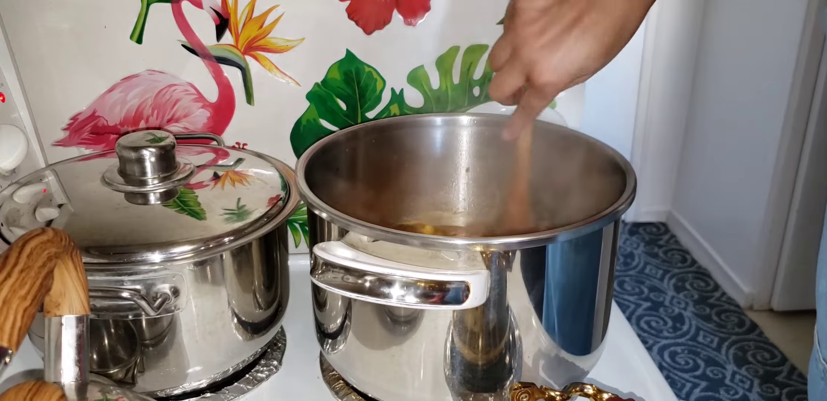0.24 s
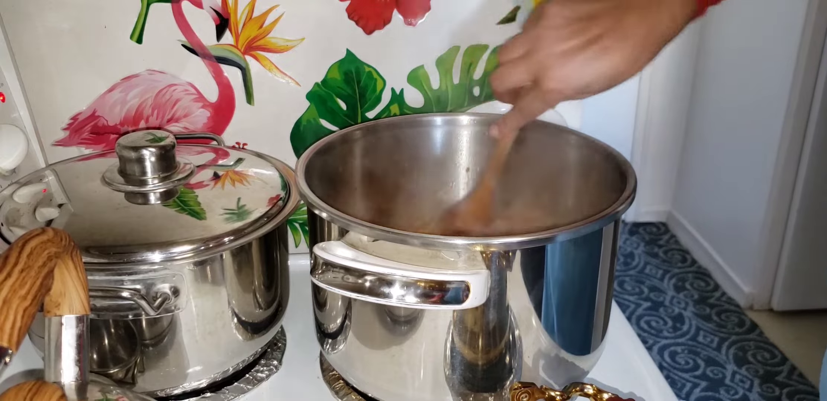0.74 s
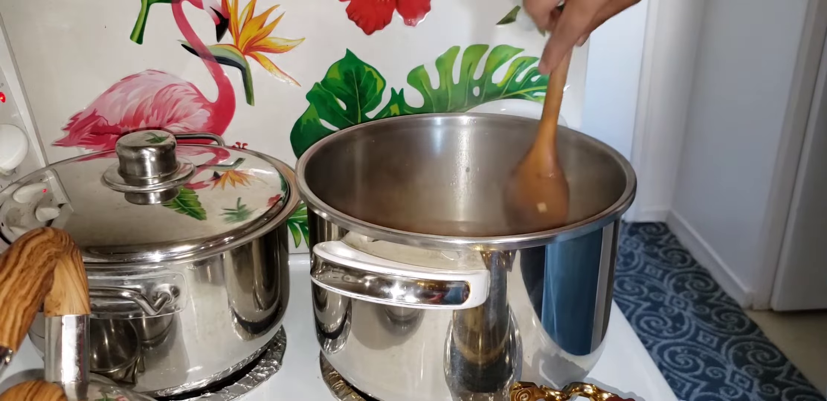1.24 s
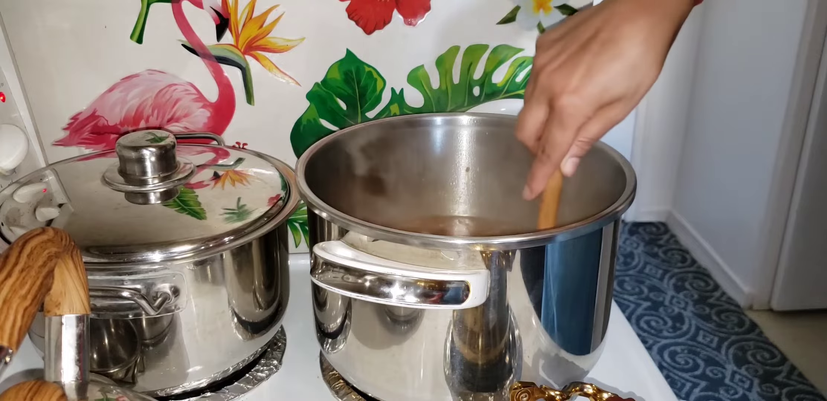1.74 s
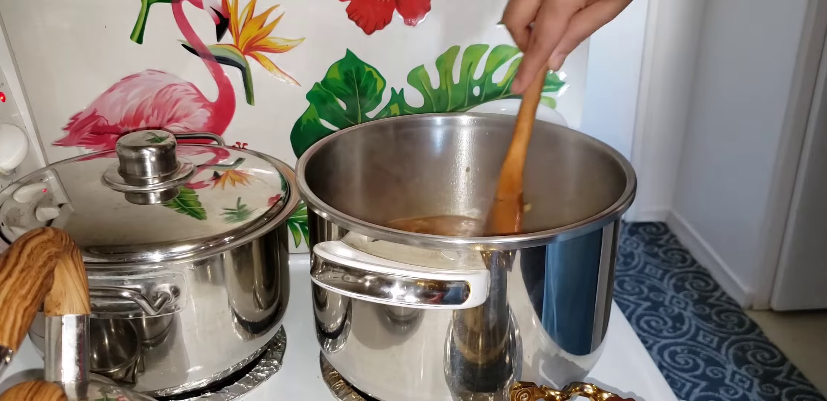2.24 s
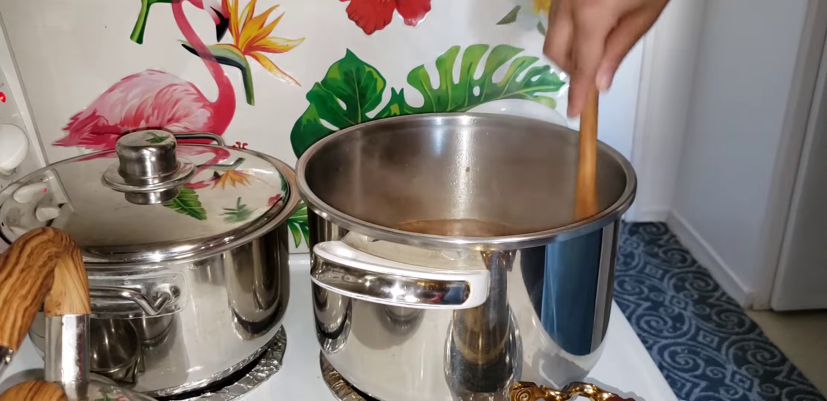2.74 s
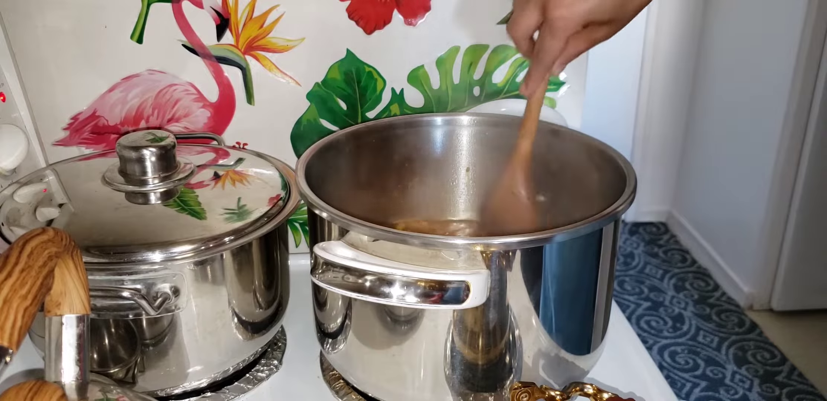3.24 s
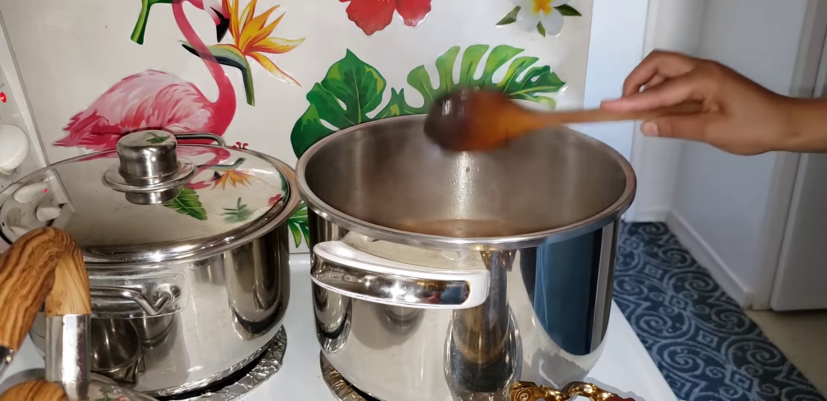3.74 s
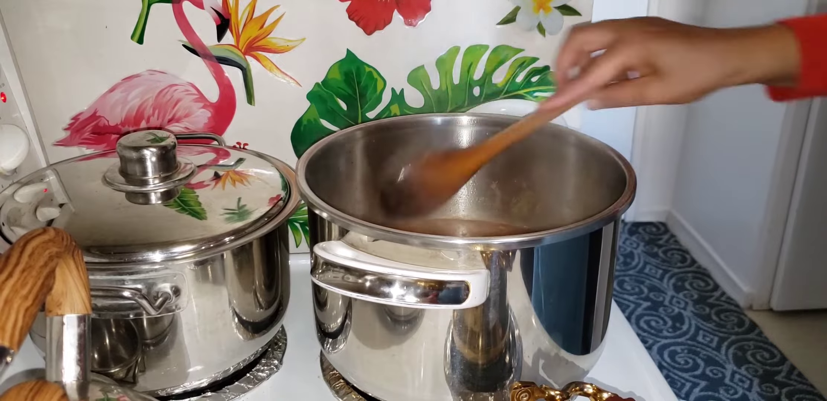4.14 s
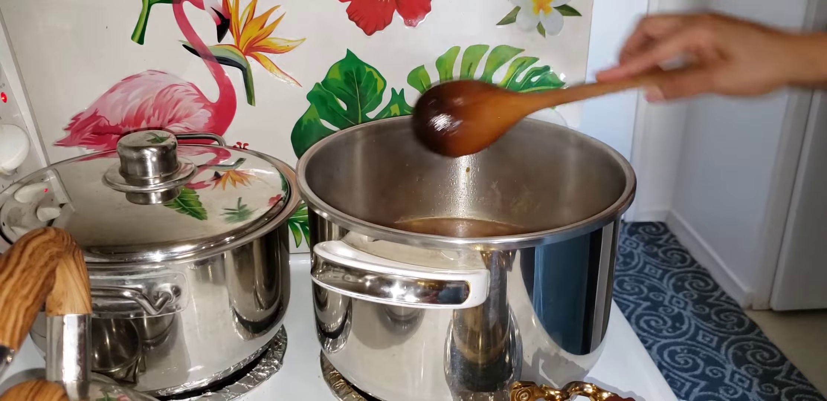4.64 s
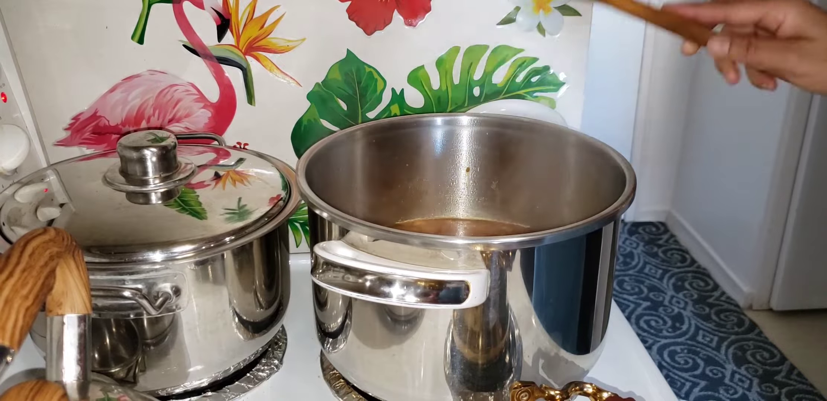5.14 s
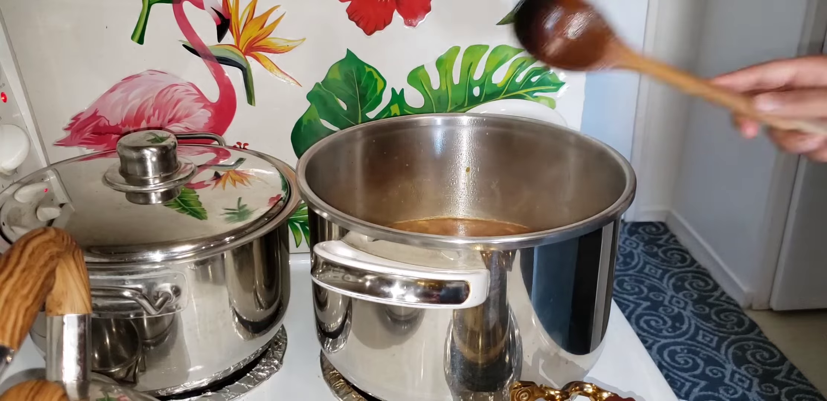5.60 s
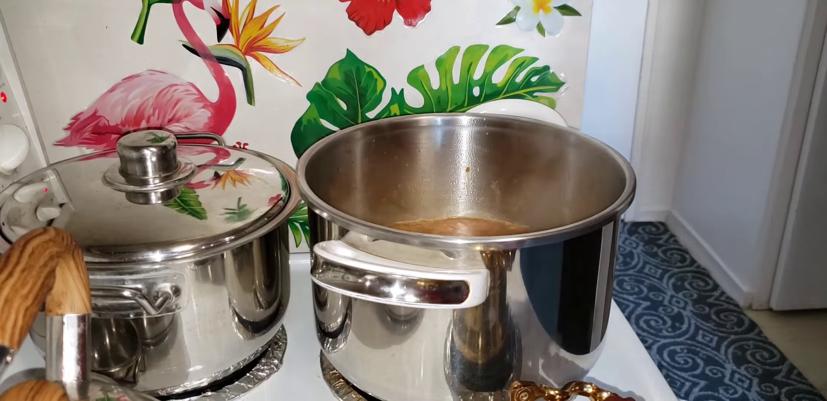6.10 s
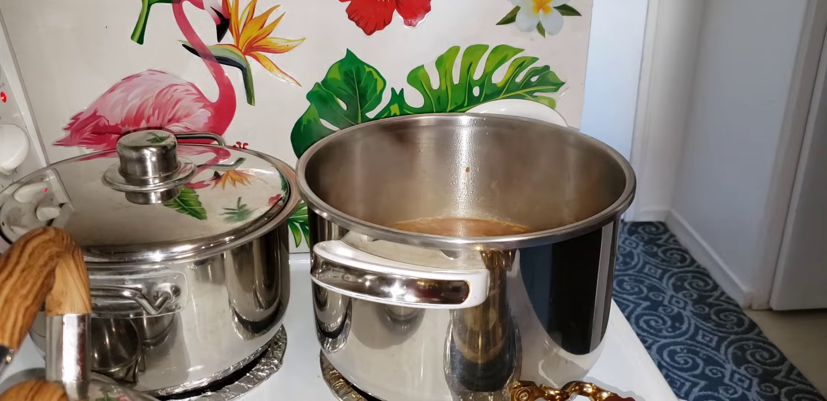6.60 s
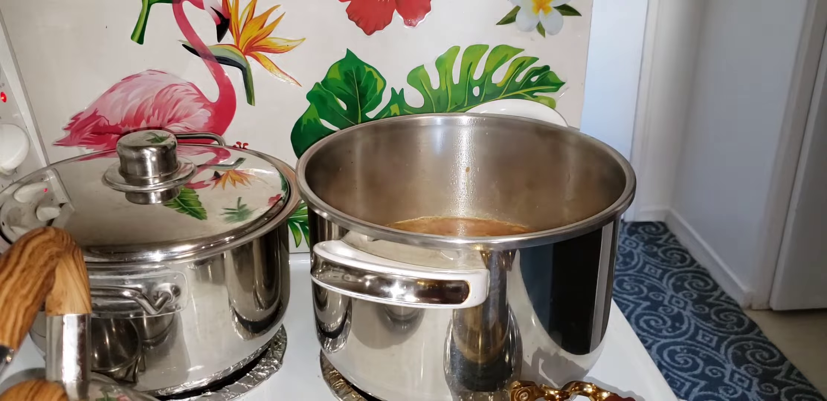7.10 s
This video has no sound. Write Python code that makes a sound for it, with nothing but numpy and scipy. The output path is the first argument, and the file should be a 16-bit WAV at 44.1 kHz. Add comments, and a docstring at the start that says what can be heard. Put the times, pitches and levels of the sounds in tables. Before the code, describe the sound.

A wooden spoon stirs thin sauce in a steel pot with wet squelches, taps the rim five times, then clatters onto a dish.

```python
"""Small kitchen: a wooden spoon stirs a thin sauce in a steel pot on a hissing gas stove, close by.
Coloured noise makes the hiss and room drone; tearing films and ringing bubbles make the sauce.
The spoon bumps the wall and is tapped on the rim five times to shake off the drops: noise cracks and
decaying modes, while the pot booms on its grate. It swishes away as a noise swell and is put down
with a clatter of bouncing blows on a ringing dish beside the stove."""
import sys
import numpy as np
from scipy import signal
from scipy.fft import rfft, irfft
from scipy.io import wavfile

SR = 44100
rng = np.random.default_rng(int(sys.argv[2]) if len(sys.argv) > 2 else 0)


def waveform_to_disk(signal):
    """Save audio, clipped to [-1, 1], as 16-bit WAV at the path in sys.argv[1]."""
    frames = np.transpose(np.atleast_2d(signal))
    scaled = np.clip(frames, -1, 1) * 32767
    samples = np.round(scaled).astype(np.int16)
    wavfile.write(sys.argv[1], SR, samples)


N = 324576
TIME = np.arange(N) / SR
RING_TIME = np.arange(SR) / SR

# Likeness of the two microphone ports. Each row: frequency [Hz], coherence (clipped to 0..1).
LIKENESS = [(25, -0.8), (68, 2.5), (230, 1), (300, .5), (640, 0.74), (1190, 0)]
# Steel pot modes. Each row: frequency [Hz], level struck on the rim [relative dB],
# level struck on the wall [relative dB], t60 before damping [s].
POT_MODES = [(399.7, -10.5, 2, 0.19), (466.4, -18.5, -4.5, 0.43), (593, -19, -3, 0.26),
             (829, -8.5, 5, 0.19), (860, -4, 3, 0.13), (913, -4.5, -5.5, 0.11), (991, 2.5, 3, 0.09),
             (1056, 5.5, -23, 0.025), (1287, 1.5, -21, 0.056), (1440, -15.5, -5, 0.3),
             (1537, 2.5, -23, 0.068), (1660, -9.5, 0, 0.074), (2594, -7, -17, 0.12), (2740, -20, -10, 0.11),
             (3876, -8.5, -13, 0.12), (4350, -7, -31, 0.11), (4704, -5.5, -33, 0.18), (4800, -8, -30, 0.14),
             (5610, -3.5, -28, 0.067), (7500, -25, -22, 0.23), (7500, -17, -24, 0.23)]
# Strokes that squelch through the sauce. Each row: time of the peak [s], level [dB], length [s].
SQUELCHES = [(0.386, -58.5, 0.021), (0.757, -48.5, 0.015), (1.009, -56, 0.013), (1.257, -50, 0.013),
             (2.795, -53, 0.027), (3.204, -58.5, 0.017), (6.31, -63.5, 0.071)]
# Drops on the dish, bowl then bouncing handle. Each row: start [s], bowl level [dB], handle lag [s],
# handle level [dB], bounce gap [s], loss at the first bounce [dB].
DISH_DROPS = [(6.4075, -27, .0157, -22, .044, 4), (6.764, -17.5, .0118, -24, .0205, 0.77)]


def amp(db):
    """Amplitude from dB."""
    return 10 ** (np.asarray(db) / 20)


def unit(x):
    """Scale to rms 1."""
    return x / np.sqrt(np.mean(x ** 2))


def unit_attack(x):
    """Scale a blow to rms 1 over its first 30 ms."""
    head = int(.03 * SR)
    return x / np.sqrt(np.mean(x[:, :head] ** 2))


def fade(t60_s):
    """Exponential decay by 60 dB in t60_s."""
    return np.exp(-np.log(1000) * RING_TIME / t60_s)


def along(points, f):
    """Read (Hz, value) points on a log-frequency axis."""
    hz, value = np.transpose(points)
    return np.interp(np.log(f + 1), np.log(hz), value)


def bell(f, hz, width_hz):
    """Power response of one resonance."""
    return 1 / (1 + (2 * (f - hz) / width_hz) ** 2)


def resonate(x, hz, sharpness):
    """Band-pass around one pitch."""
    b, a = signal.iirpeak(hz, sharpness, fs=SR)
    return signal.lfilter(b, a, x)


def noise(colour, size, peaks=()):
    """Coloured noise at the two ports: alike in the bass, unrelated in the treble."""
    f = np.fft.rfftfreq(size, 1 / SR)
    alike = np.clip(along(LIKENESS, f), 0, 1)
    mid, side = rfft(rng.standard_normal((2, size))) * np.sqrt([1 + alike, 1 - alike])
    db = along(colour, f) + sum(lift_db * bell(f, hz, width_hz) for hz, width_hz, lift_db in peaks)
    return unit(irfft(np.array([mid + side, mid - side]) * amp(db), size))


def wavering(hz, width_hz):
    """Narrow-band noise of rms 1, the same at both ports."""
    f = np.fft.rfftfreq(N, 1 / SR)
    return unit(irfft(rfft(rng.standard_normal(N)) * bell(f, hz, width_hz), N))


def add(out, s, sound):
    """Mix a sound in at time s."""
    start = max(int(s * SR), 0)
    out[:, start:start + sound.shape[1]] += sound[:, :N - start]


def ring(modes, scatter_db, damping):
    """Decaying modes; each blow weights them anew, and high ones reach the ports out of step."""
    out = 0
    for hz, db, t60_s in modes:
        size, phase, skew = rng.standard_normal(3)
        alike = np.clip(along(LIKENESS, hz), .01, 1)
        apart = skew * np.sqrt(-np.log(alike) / 2)
        angle = 2 * np.pi * hz * RING_TIME + np.pi * phase + np.array([[apart], [-apart]])
        out = out + amp(db + scatter_db * size) * fade(t60_s / damping) * np.sin(angle)
    return unit_attack(out)


def crack(colour, t60_s, snap_db, count):
    """Crowded modes: a snap and a short rustling ring; successive blows share over half their pattern."""
    shared = noise(colour, SR)
    envelope = fade(t60_s) + amp(snap_db) * fade(0.041)
    return [unit_attack((shared + 0.85 * noise(colour, SR)) * envelope) for _ in range(count)]


def contact(x, ms, press_s=0.00094, order=1):
    """The force takes a moment to build up; a longer contact excites less treble."""
    cutoff_hz = min(1000 / (np.pi * ms / 2), .45 * SR)
    pressed = x * (1 - np.exp(-RING_TIME / press_s))
    lowpass = signal.butter(order, cutoff_hz, fs=SR, output="sos")
    return unit_attack(signal.sosfilt(lowpass, pressed))


def boom(tilt_db_per_octave, rise_s=0.014, rocking_db=-21, rocking_t60_s=0.91, damping=1.27):
    """The heavy pot takes a few cycles to set the stove top swinging, then rocks on with a low rumble."""
    # Pot on the stove top. Each row: frequency [Hz], level before tilt [dB], t60 before damping [s].
    stove_modes = [(86, -11, .36), (115, 0, .32), (131, -5, .17), (158, -9, .12), (211, -18, .3)]
    # Colour of the rocking pot. Each row: frequency [Hz], level [relative dB per Hz].
    rocking_colour = [(25, -30), (50, -13), (70, -4), (110, -8), (150, -8.5), (400, -47.5)]
    pivot_hz = stove_modes[1][0]
    swing = 0
    for k, (hz, db, t60_s) in enumerate(stove_modes):
        tilted_db = db + tilt_db_per_octave * np.log2(hz / pivot_hz)
        sign = (-1) ** k  # neighbouring modes start in opposite directions
        swing = swing + sign * amp(tilted_db) * fade(t60_s / damping) * np.sin(2 * np.pi * hz * RING_TIME)
    rocking = amp(rocking_db) * noise(rocking_colour, SR) * fade(rocking_t60_s)
    return (rocking + swing) * (1 - np.exp(-RING_TIME / rise_s))


def background(gas_db=-65.0, flutter_db=2.0, flutter_width_hz=32, room_db=-54.06):
    """The gas jet hisses in its pipe and flutters a little, over the low drone of the kitchen."""
    # Colour of the gas jet. Each row: frequency [Hz], level [relative dB per Hz].
    gas_colour = [(1200, 4), (2000, 0.5), (2500, 1), (3300, -1.5), (6000, -7.5), (6900, -3.5), (7500, 4),
                  (8100, -7.5), (9100, -14.5), (12000, -11), (16000, -17)]
    # Evenly spaced burner pipe resonances. Each row: frequency [Hz], width [Hz], lift [dB].
    pipe_peaks = [(2490, 140, 8), (3130, 140, 5), (3750, 150, 5), (4370, 150, 6), (5030, 160, 7),
                  (5650, 160, 4), (6280, 160, 3)]
    # Colour of the kitchen noise. Each row: frequency [Hz], level [relative dB per Hz].
    room_colour = [(15, -50.5), (25, -11.5), (87, -8), (123, 3.5), (154, -5), (178, -5.5), (281, -5),
                   (320, -14.5), (363, -5.5), (525, -10), (564, -17.5), (996, -17), (1290, -28.5),
                   (2000, -69.5), (2600, -68), (4400, -120)]
    # Wavering drone. Each row: frequency [Hz], width [Hz], rms level [dB].
    drone_bands = [(123.5, 4.9, -63.5), (276.1, 8.8, -64.5), (359.8, 7.1, -65), (427.5, 10.5, -70.5),
                   (451, 4, -78.5)]
    flutter = wavering(0, flutter_width_hz)
    hiss = amp(gas_db + flutter_db * flutter) * noise(gas_colour, N, pipe_peaks)
    drone = sum(amp(db) * wavering(hz, width_hz) for hz, width_hz, db in drone_bands)
    return hiss + amp(room_db) * noise(room_colour, N) + drone


def wall_knocks(sharpness=2.05, leak_db=-17):
    """The wet bowl bumps the wall; where it touches sets the clack's pitch and how much the pot rings."""
    # Spoon against the inner wall. Each row: start [s], level [dB], clack pitch [Hz], contact [ms],
    # pot ring against the clack [dB], boom level [dB].
    knocks = [(.002, -42, 896, 0.24, -1, -44.5), (0.7417, -25.5, 824, 0.22, -11, -31.5),
              (0.9999, -29, 1830, 0.26, -10, -35), (1.249, -49, 3300, 0.038, -11, -38),
              (1.487, -33, 1260, 0.34, 2, -36), (2.061, -62, 617, 0.43, 0, -39.5),
              (4.3142, -36.5, 2500, 0.23, 0, -36)]
    # Colour of the crowded wall modes. Each row: frequency [Hz], level [relative dB per Hz].
    colour = [(60, -11), (300, 1.5), (450, 12), (600, 2), (900, 3.5), (1600, -5.5), (3800, -6), (7500, -8),
              (8500, -16), (16000, -9)]
    out = np.zeros((2, N))
    modes = [(hz, db, t60_s) for hz, _, db, t60_s in POT_MODES]
    clacks = crack(colour, t60_s=0.19, snap_db=6, count=len(knocks))
    for (s, db, hz, ms, ring_db, boom_db), clack in zip(knocks, clacks):
        hollow = unit_attack(resonate(clack, hz, sharpness) + amp(leak_db) * clack)
        blow = hollow + amp(ring_db) * ring(modes, scatter_db=1.9, damping=1.03)
        add(out, s, amp(db) * contact(blow, ms) + amp(boom_db) * boom(tilt_db_per_octave=13))
    return out


def stirring(drag_db=-56, ease_db_per_s=0.7, sweep_s=.56, sweep_db=1.5, lift_s=3.6, lift_fade_s=.2):
    """The spoon drags over the bottom, swelling with each sweep and easing off until it is lifted out."""
    # Colour of the drag. Each row: frequency [Hz], level [relative dB per Hz].
    colour = [(50, -13.5), (120, 1.5), (200, -4), (380, -1), (650, -13), (1000, -6.5), (1600, -27),
              (4000, -83)]
    db = drag_db - ease_db_per_s * TIME + sweep_db * np.cos(2 * np.pi * TIME / sweep_s)
    lifted = np.clip(1 - (TIME - lift_s) / lift_fade_s, 0, 1)
    return amp(db) * lifted * noise(colour, N)


def swell(s, db, length_s):
    """Power of a smooth swell that peaks at time s."""
    return amp(2 * db) * np.exp(-((TIME - s) / length_s) ** 2)


def squelches(pops_per_s=600, spread_db=4, sharpness=7, middle_hz=5260, octaves=1.11):
    """Films of sauce tear in tiny pops at each stroke and again as it slops back behind the spoon."""
    # Colour of the pops. Each row: frequency [Hz], level [relative dB per Hz].
    colour = [(800, 20), (1500, 8.5), (2600, 3), (4500, -2), (7500, -4), (8600, -15), (13000, -3),
              (16000, -8)]
    slop_lag_s, slop_db, slop_length_s = 0.083, -9, 0.034
    power = 0
    for s, db, length_s in SQUELCHES:
        slop = swell(s + slop_lag_s, db + slop_db, slop_length_s)
        power = power + swell(s, db, length_s) + slop
    pitches_hz = np.geomspace(1200, 14500, 16)
    weighting = np.exp(-(np.log2(pitches_hz / middle_hz) / octaves) ** 2)
    shares = amp(2 * along(colour, pitches_hz)) * pitches_hz * weighting
    pops = 0
    for hz, share in zip(pitches_hz, shares / shares.sum()):
        sizes = amp(spread_db * np.minimum(rng.exponential(size=N), 4))
        bursts = sizes * (rng.random(N) < pops_per_s / SR) * rng.standard_normal((2, N))
        pops = pops + np.sqrt(share) * unit(resonate(bursts, hz, sharpness))
    return np.sqrt(power) * pops


def wake(count=3, wake_db=-3, middle_hz=2810, octaves=0.58, spread_s=.15):
    """Small bubbles burst at random behind each stroke, as (s, dB, Hz); level follows the stroke's."""
    bursts = []
    for s, db, _ in SQUELCHES:
        for late, pitch in rng.random((count, 2)):
            hz = middle_hz * 2 ** (octaves * (2 * pitch - 1))
            bursts.append((s + spread_s * late, db + wake_db, hz))
    return bursts


def bubbles(cycles=95, rise_per_s=1.0, wet_db=-3, sharpness=6, snap_db=-9, snap_per_db=1.1,
            snap_t60_s=0.081):
    """Each bubble's film snaps, then it gives a short rising ring inside a wet smack of the same pitch."""
    # The loudest bubbles. Each row: start [s], level [dB], starting pitch [Hz].
    loud_bubbles = [(0.351, -41, 1930), (0.419, -43.5, 1810), (0.473, -48, 2330), (.707, -38.5, 2520),
                    (0.833, -41.5, 2500), (1.109, -40.5, 3350), (1.262, -40.5, 2620), (6.582, -41.5, 2175)]
    out = np.zeros((2, N))
    loudest_db = max(db for _, db, _ in loud_bubbles)
    for s, db, hz in loud_bubbles + wake():
        phase = rng.uniform(0, np.pi / 2, (2, 1))
        angle = 2 * np.pi * hz * RING_TIME * (1 + rise_per_s * RING_TIME / 2) + phase
        film = rng.standard_normal((2, SR))
        smack = unit(resonate(film, hz, sharpness))
        # only the strongest bursts snap brightly
        snap = amp(snap_db + snap_per_db * (db - loudest_db)) * film * fade(snap_t60_s)
        body = fade(cycles / hz) * (np.sin(angle) / 2 + amp(wet_db) * smack)
        add(out, s, amp(db) * (snap + body))
    return out


def rim_taps(ring_db=2.0, crack_db=-3, tick_db=-19, rattle_count=2):
    """Hard wood on the steel rim: a tick, a crack, a short ring, a boom, then the pot rattles back."""
    # Spoon on the rim. Each row: start [s], level [dB].
    taps = [(3.7040, -21), (3.874, -18.5), (4.0449, -19.5), (4.7901, -27.5), (4.9595, -23)]
    # Colour of the crowded rim modes. Each row: frequency [Hz], level [relative dB per Hz].
    colour = [(30, -30), (150, 8), (400, -4.5), (640, -5.5), (950, -4), (1500, -5.5), (2000, -7),
              (3200, -10), (4800, -12), (7500, -11.5), (8400, -23.5), (12000, -24), (16000, -32.5)]
    # Colour of the wooden tick. Each row: frequency [Hz], level [relative dB per Hz].
    tick_colour = [(6000, -14), (9000, -5), (12500, -7), (16000, -13)]
    # each dB weaker than a firm tap lengthens the contact, lowers the boom and tilts it higher
    firm_db, firm_contact_ms, soften_ms_per_db = -18.5, 0.045, 0.03
    boom_db, boom_db_per_db = -15, 1.36
    tilt_db_per_octave, tilt_per_db = 3, 1.2
    # the lifted pot rattles back on its grate, ever more weakly
    rattle_lag_s, rattle_gap_s = .073, .121
    rattle_db, rattle_loss_db, rattle_db_per_db = -35.5, 8, 4.2
    rattle_peaks = [(7300, 340, 7.3), (3216, 2000, 7.7)]  # Hz, width Hz, dB
    out = np.zeros((2, N))
    modes = [(hz, db, t60_s) for hz, db, _, t60_s in POT_MODES]
    clacks = crack(colour, t60_s=0.38, snap_db=1, count=len(taps))
    for (s, db), clack in zip(taps, clacks):
        weaker_db = firm_db - db
        ms = firm_contact_ms + soften_ms_per_db * max(weaker_db, 0)
        steel = contact(ring(modes, scatter_db=2.5, damping=1.58), 1.41 * ms, order=2)
        blow = unit_attack(amp(crack_db) * contact(clack, ms) + amp(ring_db) * steel)
        tick = amp(tick_db) * noise(tick_colour, SR) * fade(0.28)
        thump = boom(tilt_db_per_octave + tilt_per_db * weaker_db)
        thump = amp(boom_db - boom_db_per_db * weaker_db) * thump
        add(out, s, amp(db) * (blow + tick) + thump)
        for k in range(rattle_count):
            chatter = noise(colour, SR, rattle_peaks) * fade(0.26) * (1 - fade(.02))
            level_db = rattle_db - rattle_db_per_db * weaker_db - k * rattle_loss_db
            add(out, s + rattle_lag_s + k * rattle_gap_s, amp(level_db) * unit_attack(chatter))
    return out


def swish(s=5.452, length_s=0.031, db=-45):
    """A short soft swell of noise as the spoon is swung away."""
    # Colour of the swish. Each row: frequency [Hz], level [relative dB per Hz].
    colour = [(200, -10), (500, -8), (900, 3), (1400, -5), (2300, -3.5), (4000, -12.5), (7500, -23.5),
              (9000, -27), (16000, -40)]
    return amp(db) * np.exp(-((TIME - s) / length_s) ** 2 / 2) * noise(colour, N)


def landings(count=4, bowl_ms=0.15, handle_ms=0.064, bounce_soften_ms=0.1):
    """Blows as (s, dB, contact ms): the bounces of the handle weaken and soften ever faster."""
    blows = [(6.7025, -39.5, 3.4)]  # the spoon tips softly before its second drop
    for s, bowl_db, lag_s, handle_db, gap_s, loss_db in DISH_DROPS:
        blows.append((s, bowl_db, bowl_ms))
        for k in range(count):
            ms = handle_ms + k ** 2 * bounce_soften_ms
            blows.append((s + lag_s + k * gap_s, handle_db - k ** 2 * loss_db, ms))
    return blows


def set_down(ring_db=-3, crack_db=-2, thud_db=-33, thud_hz=118, thud_t60_s=0.4, lowest_hz=170):
    """Bowl, then bouncing handle, ring the dish; the worktop thuds under the first landing."""
    # Dish modes. Each row: frequency [Hz], level [relative dB], t60 before damping [s].
    dish_modes = [(334, -13, .45), (538, 0, .2), (622, -4, .2), (793, 1, .25), (888, -2, .25),
                  (1184, -10, .22), (1545, -6, .17), (1886, -7, .24), (2207, -7, .2), (2430, 1, .14),
                  (2490, -3, .12), (3122, 1, .16), (3405, 0, .16), (3442, 4, .17), (4238, -13, .18),
                  (4995, -8, .14), (5130, -13, .16), (5458, -3, .16), (5925, -14, .16), (6110, -14, .14),
                  (6785, -17, .18), (7150, -12, .16), (8550, -16, .08), (9210, -20, .16), (10990, -18, .17)]
    # Colour of the crowded dish modes. Each row: frequency [Hz], level [relative dB per Hz].
    colour = [(30, -41), (80, -10), (120, -1), (185, -15.5), (260, -6), (520, -1.5), (900, -6.5),
              (1300, -11), (2400, -14), (3500, -14.5), (4000, -21), (7400, -26.5), (8500, -30),
              (12000, -30), (16000, -38)]
    out = np.zeros((2, N))
    blows = landings()
    clacks = crack(colour, t60_s=0.14, snap_db=-14, count=len(blows))
    for (s, db, ms), clack in zip(blows, clacks):
        blow = amp(crack_db) * clack + amp(ring_db) * ring(dish_modes, scatter_db=4, damping=2.1)
        add(out, s, amp(db) * contact(blow, ms))
    # the dish blows carry no deep bass
    out = signal.sosfilt(signal.butter(2, lowest_hz, "high", fs=SR, output="sos"), out)
    thud = fade(thud_t60_s) * (1 - fade(0.018)) * np.sin(2 * np.pi * thud_hz * RING_TIME)
    add(out, DISH_DROPS[0][0], amp(thud_db) * thud[None])
    return out


def kitchen_room(x, wet_db=-11, t60_low_s=0.43, t60_high_s=0.25, build_s=0.0039):
    """Tiles and cupboards return a short dense tail whose treble dies first."""
    tail = noise([(60, 21.0), (300, 3.4), (16000, 7.6)], SR)
    low = signal.sosfilt(signal.butter(1, 3000, fs=SR, output="sos"), tail)
    tail = low * fade(t60_low_s) + (tail - low) * fade(t60_high_s)
    tail = tail * (1 - np.exp(-(RING_TIME / build_s) ** 2))
    wet = signal.fftconvolve(x, unit(tail) / np.sqrt(SR), axes=1)[:, :N]
    return x + amp(wet_db) * wet


def scene():
    """Everything that the spoon does sounds in the room, over the stove."""
    stir = wall_knocks() + stirring() + squelches() + bubbles()
    finish = rim_taps() + swish() + set_down()
    return background() + kitchen_room(stir + finish)


def record(dry, top_hz=15900):
    """The left port faces the pot and hears more treble; the top is cut."""
    # Port balance. Each row: frequency [Hz], left minus right [dB].
    balance = [(60, 3.6), (150, 4), (400, 1.6), (900, 3.3), (2400, 2.3), (4500, 5.8), (7500, 12.7),
               (9000, 1.1), (15000, 0.73)]
    lean_db = along(balance, np.fft.rfftfreq(N, 1 / SR)) / 2
    ports = irfft(rfft(dry) * amp([lean_db, -lean_db]), N)
    return signal.sosfilt(signal.ellip(10, .2, 70, top_hz, fs=SR, output="sos"), ports)


dry = scene()
out = record(dry)
waveform_to_disk(out)
```